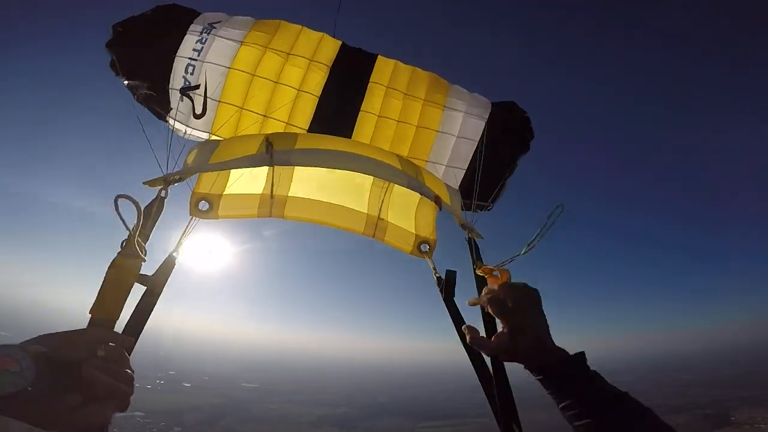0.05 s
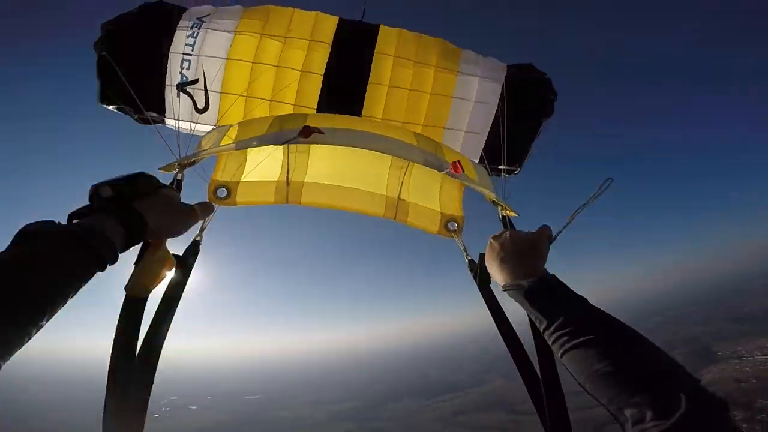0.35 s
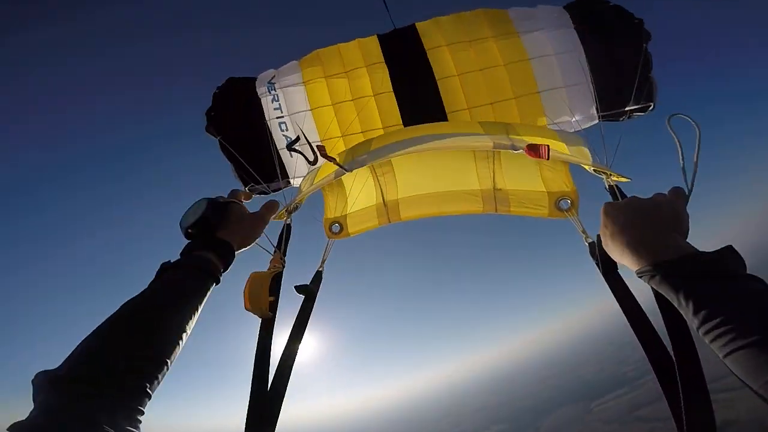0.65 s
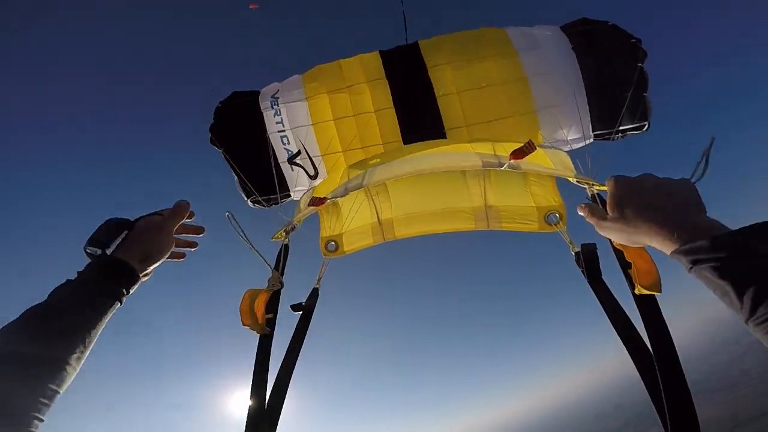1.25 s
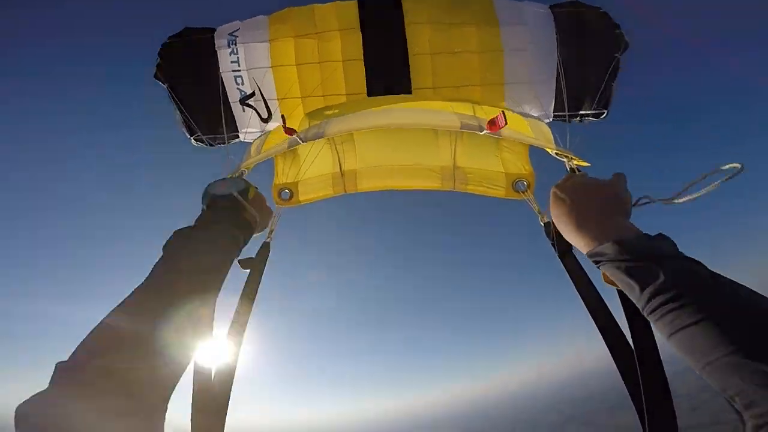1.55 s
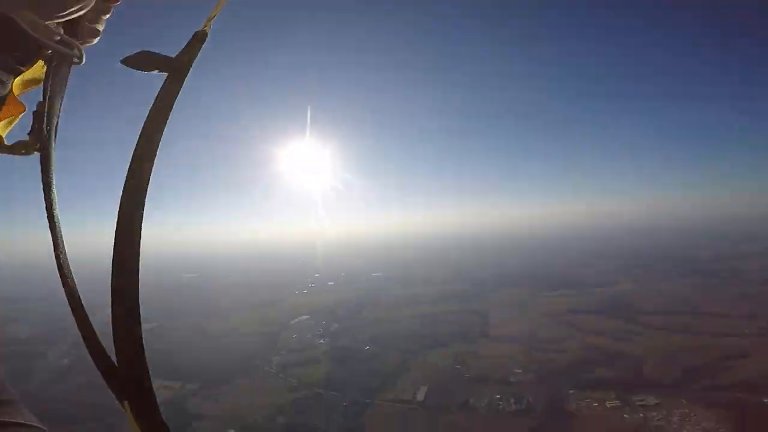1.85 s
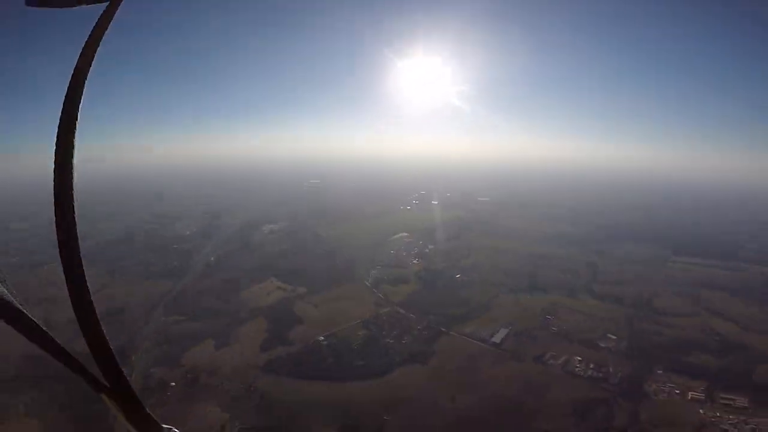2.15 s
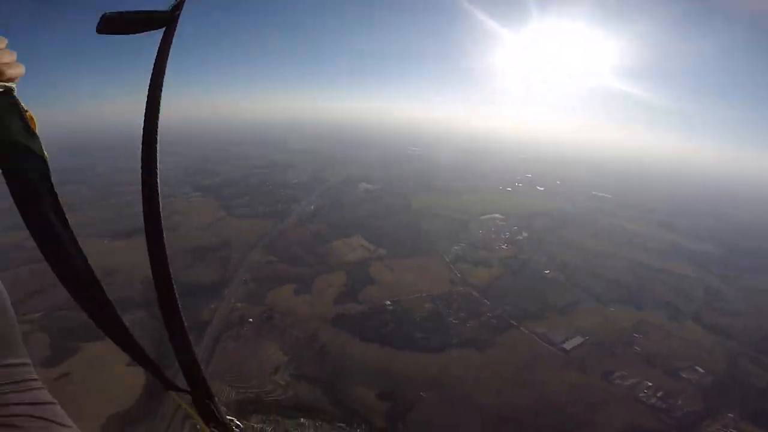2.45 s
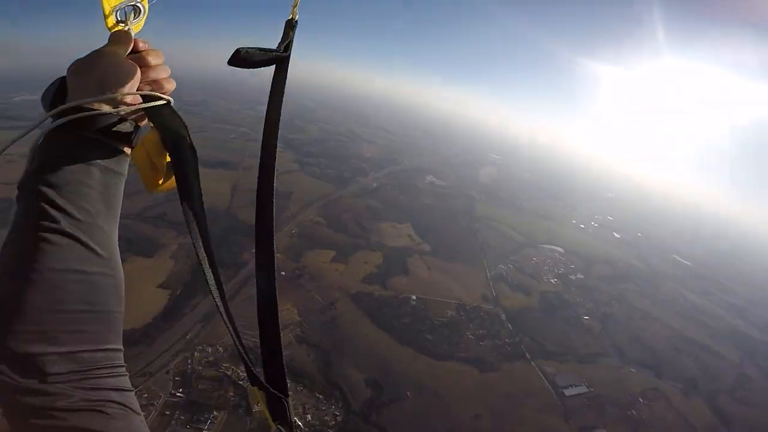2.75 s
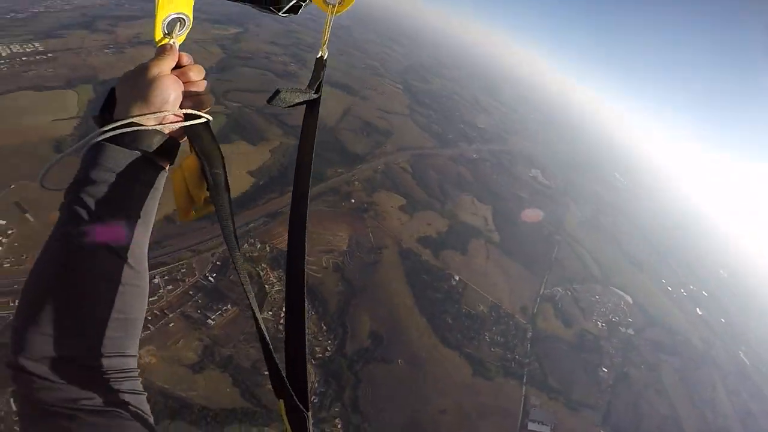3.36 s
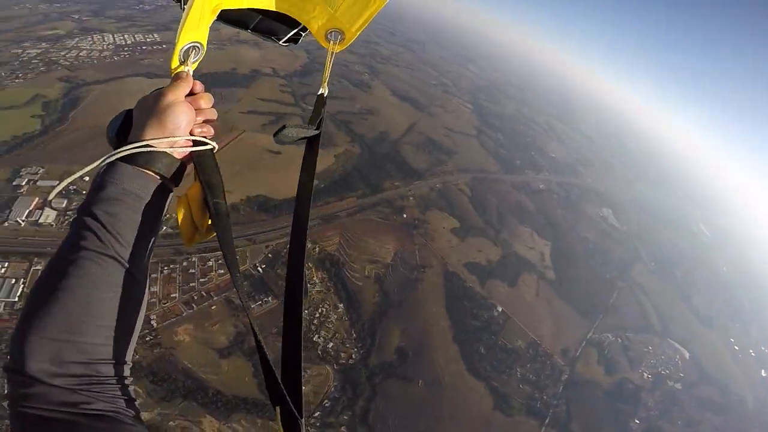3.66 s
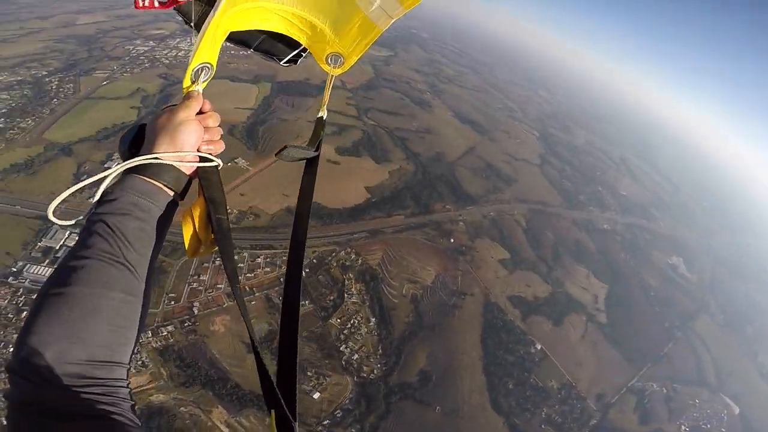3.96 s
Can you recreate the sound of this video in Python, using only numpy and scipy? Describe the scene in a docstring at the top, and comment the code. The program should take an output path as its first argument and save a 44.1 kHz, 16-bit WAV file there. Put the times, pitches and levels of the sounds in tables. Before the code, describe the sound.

Wind buffets a helmet microphone under an open parachute, with a deep rumble and irregular thumps while sleeves and straps rustle close by. After a brief lull, the wind steadies and a hiss rises.

```python
"""Wind under an open parachute

Open air, with the microphone on the helmet, right in the flow. At first the air is broken:
eddies slap the port while sleeves and straps rustle within arm's reach. After a lull the head
turns into the stream, the buffeting steadies and a hiss rises, ringing in the camera housing."""
import sys
import numpy as np
from scipy import signal
from scipy.fft import rfft, irfft
from scipy.io import wavfile
from scipy.ndimage import uniform_filter1d

SR = 44100
rng = np.random.default_rng(int(sys.argv[2]) if len(sys.argv) > 2 else 0)


def to_wav(sig):
    """Store sig (one row per channel, or 1-D mono) as 16-bit WAV at the path in sys.argv[1].

    Samples outside -1..1 are clipped; the rate is SR.
    """
    pcm = np.clip(np.atleast_2d(sig), -1, 1) * 32767
    pcm = np.round(pcm).astype(np.int16)
    wavfile.write(sys.argv[1], SR, pcm.T)  # frames by channels


N = 176400

# resonances of the housing around the microphone (centre [Hz], width [Hz], lift [dB])
HOUSING_RESONANCES = [(2520, 240, 3.1), (3143, 440, 7), (3630, 400, 10.8), (4230, 130, 5.4),
                      (4970, 500, 8.6), (6215, 730, 9.3)]


def from_db(db):
    """Decibels to gain."""
    return 10 ** (np.asarray(db) / 20)


def unit_rms(x):
    """Scale to unit rms."""
    return x / np.sqrt(np.mean(x ** 2) + 1e-20)


def level(rows):
    """Gain over time from rows of (time [s], level [dB])."""
    return from_db(np.interp(np.arange(N) / SR, *np.transpose(rows)))


def noise(spectrum, resonances=()):
    """Noise of unit rms with a smooth spectrum, lifted at the given resonances."""
    hz = np.maximum(np.arange(N // 2 + 1) * SR / N, 1)
    points_hz, points_db = np.transpose(spectrum)
    db = np.interp(np.log(hz), np.log(points_hz), points_db)
    for centre, width, lift in resonances:
        db = db + lift * .5 ** ((2 * (hz - centre) / width) ** 2)
    low_hz, high_hz = .5 * points_hz[0], 2 * points_hz[-1]
    skirts = 1 / np.sqrt((1 + (hz / high_hz) ** 4) * (1 + (low_hz / hz) ** 4))
    return unit_rms(irfft(rfft(rng.standard_normal(N)) * from_db(db) * skirts, N))


def flutter(x, rate_hz, depth_db):
    """Turbulence shakes the level at random, mostly slower than rate_hz."""
    hz = np.arange(N // 2 + 1) * SR / N
    drift = unit_rms(irfft(rfft(rng.standard_normal(N)) / (1 + (hz / rate_hz) ** 2), N))
    return unit_rms(x * from_db(depth_db * np.clip(drift, -2, 2)))


def evened(x, span_s, share):
    """Take a share of the chance swells out of a noise."""
    power = uniform_filter1d(np.abs(signal.hilbert(x)) ** 2, max(int(span_s * SR), 1))
    return unit_rms(x / (power + 1e-6) ** (.5 * share))


def rumble():
    """Large eddies rock the pressure at the microphone port: a deep rumble with a boom just above."""
    # swell of each band (time [s], level [dB])
    deep_level = [(0, -10.5), (.25, -13.5), (.75, -15), (1.25, -17), (1.82, -15), (1.95, -23), (2.15, -27),
                  (2.5, -22), (2.9, -19), (4, -13)]
    boom_level = [(0, -17.5), (1.8, -23), (2.15, -29), (2.4, -28), (2.56, -16.5), (3.1, -21.5), (3.5, -16),
                  (4, -13)]
    # colour of each band (frequency [Hz], relative density [dB])
    deep_spectrum = [(14, -36), (26, 4.5), (40, -3.5), (56, 1.5), (90, -22.5)]
    boom_spectrum = [(42, -6), (62, 4), (82, 3), (120, -4), (210, -16.5), (290, -20.5), (450, -49)]
    deep = level(deep_level) * evened(noise(deep_spectrum), span_s=0.093, share=0.54)
    boom = level(boom_level) * evened(noise(boom_spectrum), span_s=0.11, share=1.0)
    return deep + boom


def buffet():
    """Small eddies bluster right in the port, with little above 500 Hz."""
    # strength of the bluster (time [s], level [dB])
    bluster_level = [(0, -29.5), (.18, -29), (.4, -23), (.66, -22), (.78, -27.5), (1.04, -25.5),
                     (1.61, -25.5), (1.73, -14.5), (1.84, -18), (1.88, -23.5), (2.12, -30.5), (2.42, -26.5),
                     (2.55, -16), (2.7, -18.5), (2.8, -24.5), (3.12, -23.5), (3.22, -20.5), (4, -20.5)]
    # its colour (frequency [Hz], relative density [dB])
    bluster_spectrum = [(50, -2.5), (110, -5), (230, -0.5), (340, -0.5), (480, -2.5), (580, -12),
                        (720, -25.5), (1000, -41), (2000, -39.5), (5000, -59)]
    bluster = evened(noise(bluster_spectrum), span_s=0.027, share=0.48)
    return level(bluster_level) * flutter(bluster, rate_hz=44, depth_db=3.0)


def airstream():
    """Air streams over the helmet: a midrange rush, a hiss ringing in the housing, a fine fizz on top."""
    # swell of each band (time [s], level [dB])
    rush_level = [(0, -71), (.4, -62.5), (.75, -58.5), (1.5, -52.5), (1.8, -46), (1.92, -46.5), (2.35, -52),
                  (2.6, -54), (3.7, -43.5), (4, -35)]
    hiss_level = [(0, -60), (.45, -50), (.72, -67), (1.4, -69), (1.68, -52.5), (1.94, -63.5), (2.13, -48),
                  (2.8, -39.5), (3.65, -37.5), (4, -43.5)]
    fizz_level = [(0, -88.5), (1.5, -76.5), (1.8, -67), (2.2, -61), (3, -62), (3.7, -54), (4, -60)]
    # colour of each band (frequency [Hz], relative density [dB])
    rush_spectrum = [(300, -10.5), (700, 10), (1100, -2), (1600, -3.5), (2200, -11), (3000, -6.5),
                     (6000, -13), (14000, -62)]
    hiss_spectrum = [(700, -26), (2300, -10), (3300, -2), (4400, -7), (6400, -14), (7100, -21),
                     (15000, -26)]
    fizz_spectrum = [(5500, 5), (7900, 7), (8650, -4.5), (9900, 6.5), (11000, 0.5), (13100, 4),
                     (14000, -6.5), (15500, -13.5)]
    rush = level(rush_level) * flutter(noise(rush_spectrum), rate_hz=190, depth_db=3.5)
    ringing_air = noise(hiss_spectrum, HOUSING_RESONANCES)
    hiss = level(hiss_level) * flutter(ringing_air, rate_hz=21, depth_db=0.74)
    fizz = level(fizz_level) * noise(fizz_spectrum)
    return rush + hiss + fizz


def cloth():
    """Sleeves and straps within arm's reach crinkle and now and then snap, heard through the housing."""
    # strength of the rustle (time [s], level [dB])
    rustle_level = [(0, -58), (.1, -52), (.46, -49), (.58, -53), (.72, -62.5), (1.25, -59.5), (1.42, -66),
                    (1.53, -48.5), (1.62, -61), (2.3, -68)]
    # snaps of cloth and straps (time [s], peak level [dB])
    snaps = [(0.081, -40), (.141, -40), (0.232, -52), (0.422, -35.5), (.459, -35), (.528, -36.5),
             (.599, -40), (0.671, -40.5), (.85, -43), (1.175, -45), (1.244, -43.5), (1.543, -34.5),
             (1.643, -38.5)]
    # colour of the fabric (frequency [Hz], relative density [dB])
    fabric_spectrum = [(700, -11), (2000, -4.5), (3200, 1.5), (5000, -7), (6400, -13.5), (7500, -15.5),
                       (15000, -31)]
    rise_s, decay_s = 0.0023, 0.0035
    t, snap_envelope = np.arange(N) / SR, 0
    for peak_s, db in snaps:
        age = t - peak_s
        snap_envelope += from_db(db) * np.exp(-np.maximum(-age / rise_s, age / decay_s))
    crinkle = flutter(noise(fabric_spectrum, HOUSING_RESONANCES), rate_hz=84, depth_db=9.0)
    snapping = snap_envelope * noise(fabric_spectrum, HOUSING_RESONANCES)
    return level(rustle_level) * crinkle + snapping


def slaps():
    """Eddies hit the port for milliseconds: a thud, and a treble spray that pulses with its pressure."""
    # eddies on the microphone (peak time [s], half-length [s], thud level [dB], spray level [dB])
    eddies = [(0.218, 0.0029, -15.5, -47), (0.304, 0.015, -19, -48), (0.352, 0.0026, -8.5, -31),
              (.364, 0.005, -12, -36), (0.421, 0.0057, -13, -45), (0.477, 0.0059, -7.5, -30.5),
              (0.5057, 0.001, -8.5, -29.5), (0.514, 0.0026, -13, -65), (0.648, 0.0021, -14.5, -46),
              (0.853, 0.0093, -18, -44), (0.905, 0.0049, -10, -41), (0.996, 0.0084, -11.5, -40),
              (1.031, 0.0046, -16.5, -42), (1.07, 0.005, -12, -43), (1.171, 0.0044, -21, -38.5),
              (1.268, 0.0023, -12, -38), (1.334, 0.0037, -4.5, -29.5), (1.413, 0.0019, -17, -32.5),
              (1.425, 0.0037, -9, -30.5), (1.48, 0.0038, -7.5, -31.5), (1.52, 0.0038, -14, -48),
              (1.542, 0.0046, -17.5, -28.5), (1.558, 0.0081, -10.5, -48), (1.739, 0.025, -13, -39.5),
              (1.801, 0.008, -13, -35), (1.825, 0.0027, -6.5, -33.5), (1.85, 0.0058, -12.5, -39),
              (2.814, 0.0022, -13, -47)]
    # colour of thud and spray (frequency [Hz], relative density [dB])
    thud_spectrum = [(75, -0.5), (130, 1), (290, -1), (470, -3), (580, -14), (750, -24), (1100, -48.5),
                     (2500, -66)]
    spray_spectrum = [(300, -21.5), (700, 7.5), (1500, 0.5), (2200, -9), (3400, -9), (4200, -22.5),
                      (5100, -15.5), (6400, -20.5), (7500, -36.5), (14000, -37)]
    t, thud_power, spray_power = np.arange(N) / SR, 0, 0
    for peak_s, half_s, thud_db, spray_db in eddies:
        swell = np.exp(-.5 * ((t - peak_s) / half_s) ** 2)
        thud_power += from_db(thud_db) ** 2 * swell
        spray_power += from_db(spray_db) ** 2 * swell ** 1.45  # shorter than the thud
    pressure = evened(noise(thud_spectrum), span_s=0.0044, share=1)
    spray = evened(noise(spray_spectrum) * from_db(4 * pressure), span_s=0.006, share=0.94)
    return np.sqrt(thud_power) * pressure + np.sqrt(spray_power) * spray


def gusts():
    """Each big eddy gives the microphone one deep shove, a few tens of milliseconds long."""
    # shoves at the port (time [s], peak level [dB])
    shoves = [(0.348, -8.5), (0.417, -14), (0.914, -13.5), (1.0, -11.5), (1.34, -9.5), (1.484, -9),
              (1.546, -6.5), (2.31, -11.5), (2.478, -13), (3.43, -12)]
    # their colour (frequency [Hz], relative density [dB])
    shove_spectrum = [(32, -6), (48, 5.5), (75, -11.5), (140, -38.5)]
    t, half_s = np.arange(N) / SR, 0.017
    swells = sum(from_db(db) * np.exp(-.5 * ((t - peak_s) / half_s) ** 2) for peak_s, db in shoves)
    return swells * evened(noise(shove_spectrum), span_s=0.035, share=0.93)


def roar():
    """A low, hollow roar joins in as the head turns the microphone into the stream."""
    # swell of the roar (time [s], level [dB])
    roar_level = [(2.1, -46), (2.4, -27), (2.6, -18.5), (3.13, -24), (3.25, -16.5), (3.36, -32), (4, -23.5)]
    # its colour (frequency [Hz], relative density [dB])
    roar_spectrum = [(90, -6), (140, -2), (230, 1.5), (380, -32)]
    return level(roar_level) * evened(noise(roar_spectrum), span_s=0.027, share=0.81)


def scene():
    """Everything meets close up at one helmet microphone in open air."""
    return (rumble() + gusts() + roar() + buffet() + slaps() + airstream() + cloth())[None]


def record(dry):
    """The camera rounds off the highest peaks and cuts the top of the treble."""
    knee, ceiling, cutoff_hz = .7, .96, 15200
    headroom = ceiling - knee
    linear_part = np.clip(dry, -knee, knee)
    rounded = linear_part + headroom * np.tanh((dry - linear_part) / headroom)
    lowpass = signal.ellip(10, .1, 80, cutoff_hz, fs=SR, output="sos")
    return signal.sosfilt(lowpass, rounded)


dry = scene()
out = record(dry)
to_wav(out)
```